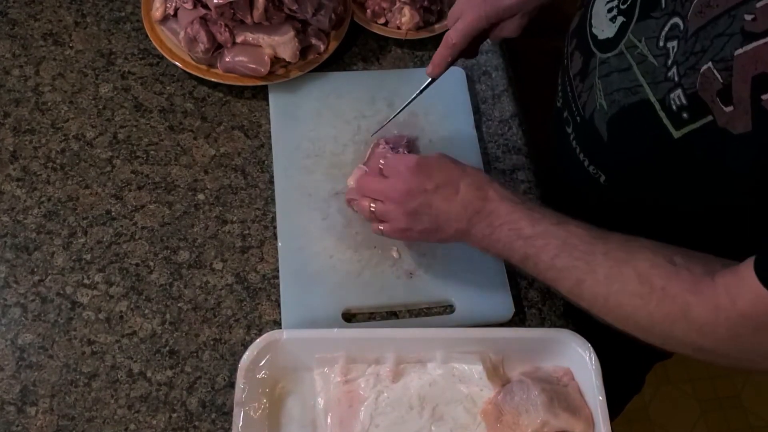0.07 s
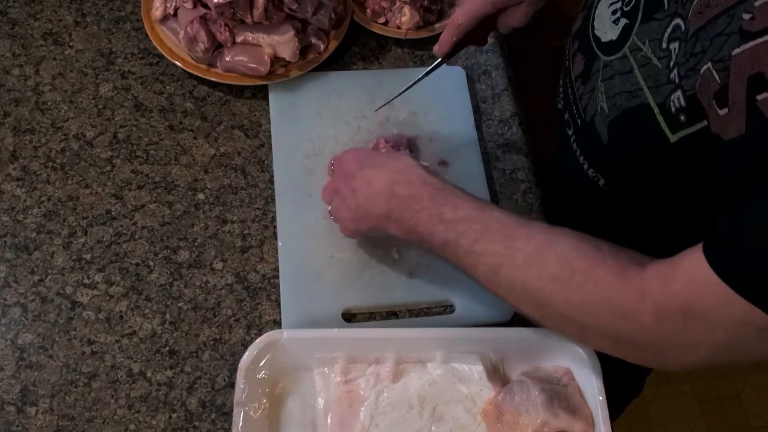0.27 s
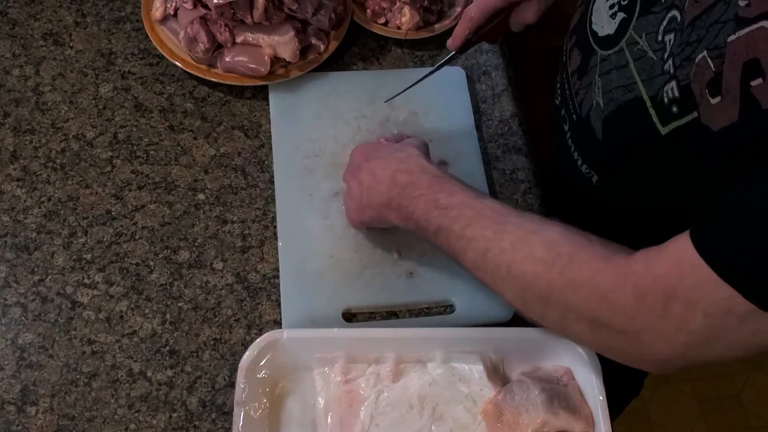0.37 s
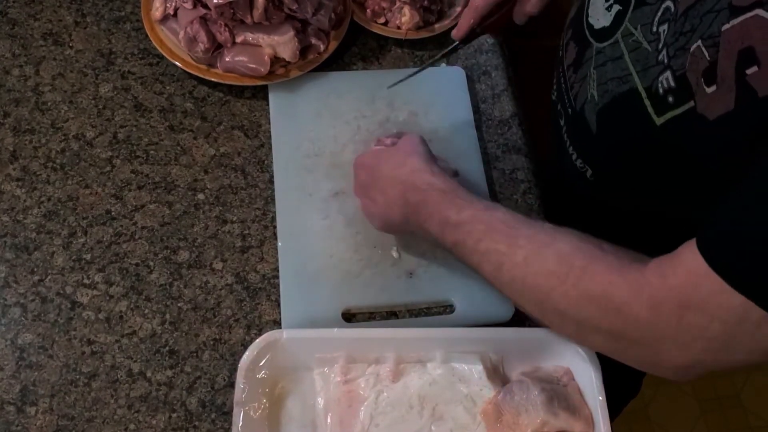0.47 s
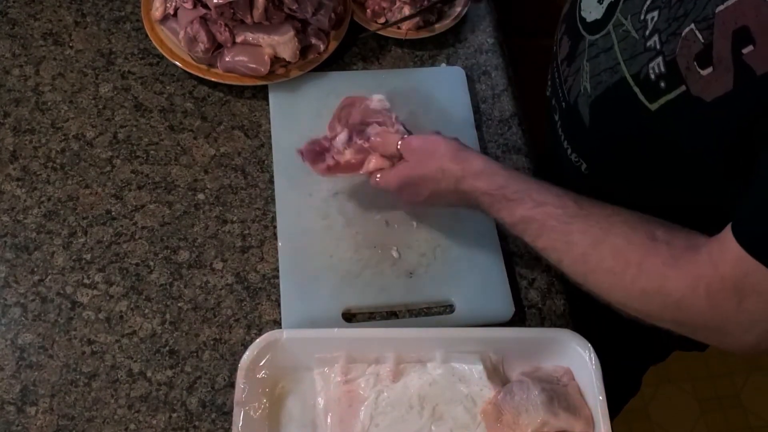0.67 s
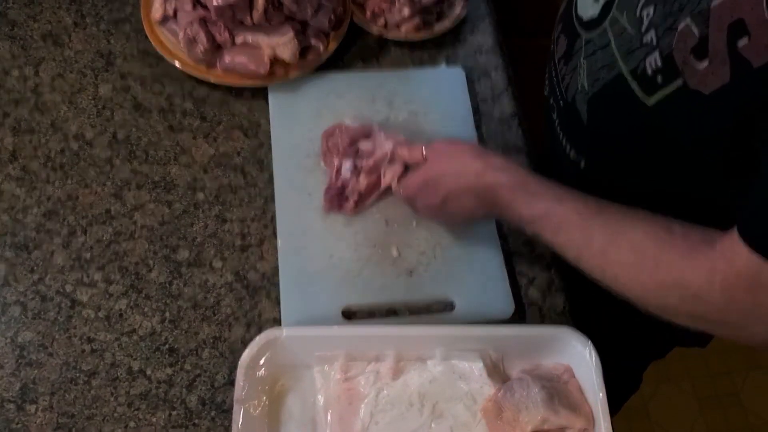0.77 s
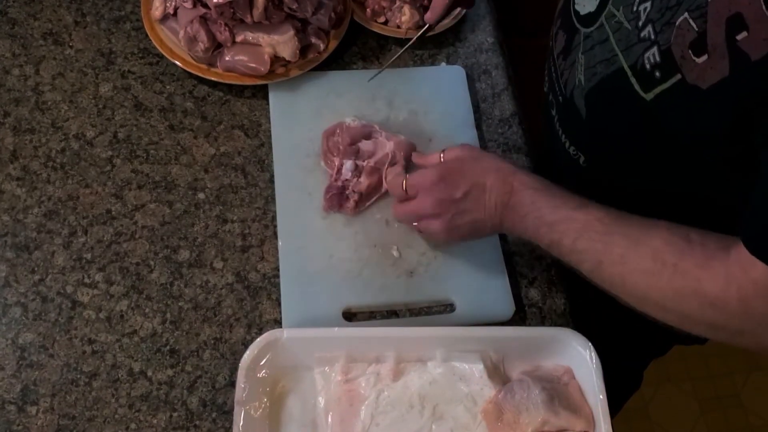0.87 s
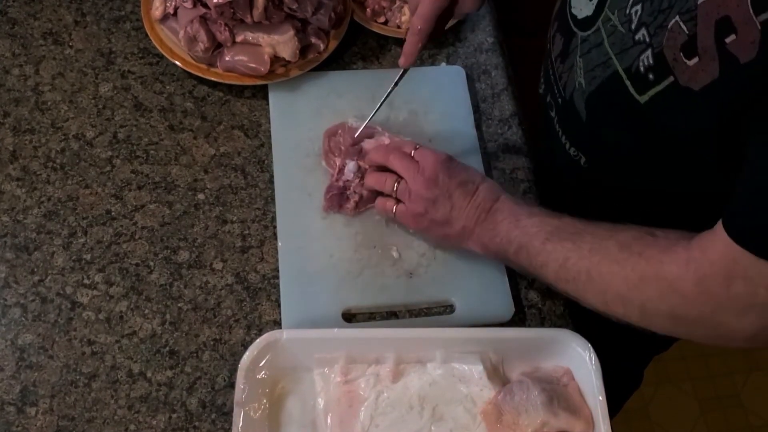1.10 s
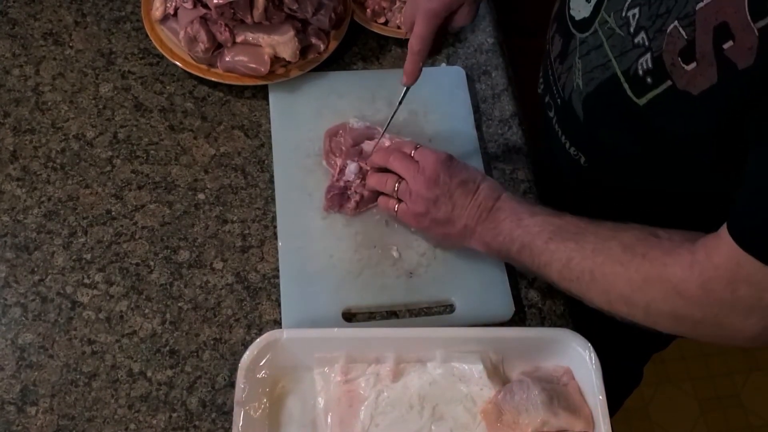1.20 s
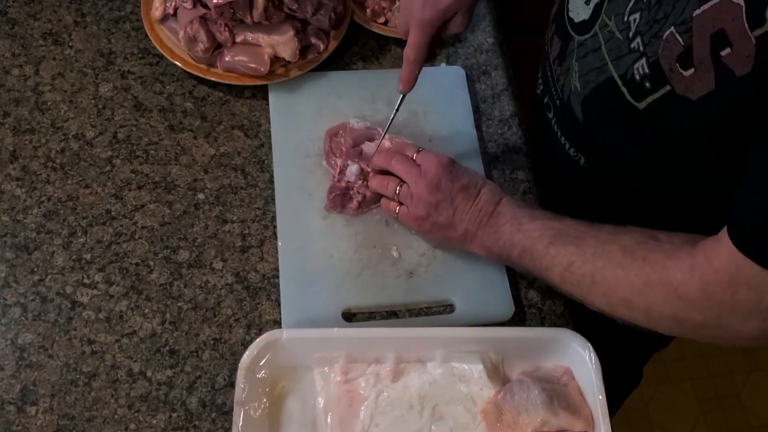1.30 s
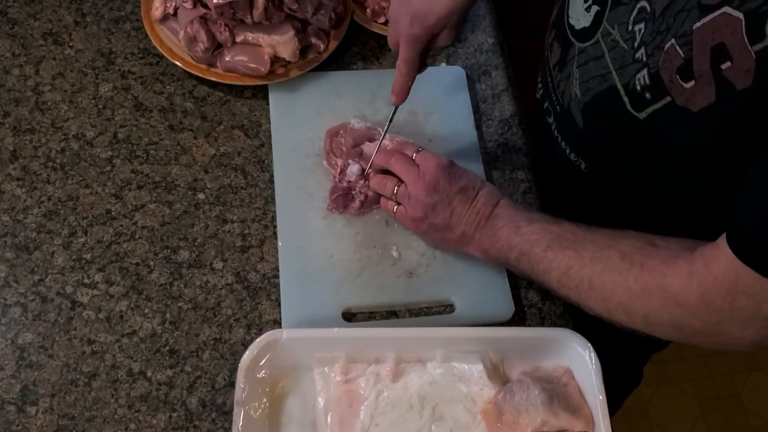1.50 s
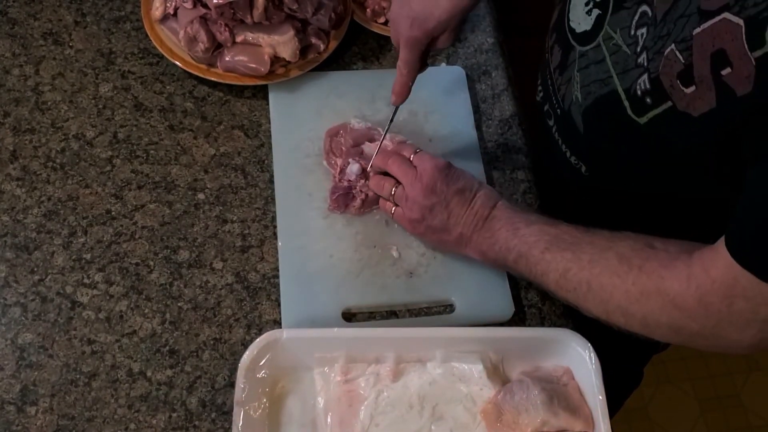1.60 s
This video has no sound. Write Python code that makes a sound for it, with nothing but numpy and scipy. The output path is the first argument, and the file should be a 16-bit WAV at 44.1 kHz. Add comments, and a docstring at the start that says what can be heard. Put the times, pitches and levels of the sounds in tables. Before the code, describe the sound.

A knife knocks on a plastic cutting board: first a heavy, dull double thump, then wet meat squelching and crackling, then one sharp clack and faint presses, close microphone in a small kitchen with low rumble.

```python
"""Trimming meat in a small kitchen

One microphone hears meat worked on a plastic cutting board on a stone counter, over a low room rumble.
A heavy, dull blow shakes the board: soft pushes slap the meat and ring the board's damped modes.
Wet meat slides and crackles as it is turned over: random clicks and hiss follow the sliding effort.
The knife knocks sharply: short scrapes set off a snap and a clack. Soft presses and wet ticks follow."""
import sys
import numpy as np
from scipy import signal
from scipy.fft import rfft, irfft
from scipy.io import wavfile
from scipy.ndimage import uniform_filter1d

SR = 44100
rng = np.random.default_rng(int(sys.argv[2]) if len(sys.argv) > 2 else 0)


def file_out(sig):
    """Save sig as 16-bit WAV at sys.argv[1]."""
    # one column per channel
    cols = np.atleast_2d(sig).T
    # limit, then scale
    lim = np.clip(cols, -1, 1)
    pcm = np.round(lim * 32767).astype(np.int16)
    wavfile.write(sys.argv[1], SR, pcm)


N = 72765


def undb(db):
    """Decibels to amplitude gain."""
    return 10 ** (np.asarray(db) / 20)


def unit(x):
    """Scale to unit energy."""
    return x / np.sqrt(np.sum(x ** 2))


def clock():
    """Time of every sample in seconds."""
    return np.arange(N) / SR


def t60_fade(t60_s):
    """Exponential decay that falls 60 dB in t60_s."""
    return np.exp(-np.log(1000) * clock() / t60_s)


def level_curve(points):
    """Gain over time, drawn straight in dB between (time [s], level [dB]) points."""
    times_s, levels_db = np.array(points).T
    return undb(np.interp(clock(), times_s, levels_db))


def through(x, response):
    """Pass a sound through an impulse response."""
    return signal.fftconvolve(x, response)[:N]


def place(x, start_s):
    """Delay a sound to its start time and pad it to the full length."""
    silence = np.zeros(max(int(start_s * SR), 0))
    return np.concatenate([silence, x, np.zeros(N)])[:N]


def colour(points):
    """Minimum-phase unit-energy response with the given (frequency [Hz], level [dB]) spectrum."""
    hz, db = np.array(points).T
    size = 8192
    bins_hz = np.fft.rfftfreq(size, 1 / SR)
    log_gain = np.log(undb(np.interp(np.log(bins_hz + 1), np.log(hz), db)))
    # folding the cepstrum onto positive times makes the response causal
    cepstrum = irfft(log_gain)
    cepstrum[1:size // 2] *= 2
    cepstrum[size // 2 + 1:] = 0
    return unit(irfft(np.exp(rfft(cepstrum))))


def noise(points):
    """Steady noise of the given colour, rms about 1."""
    return through(rng.standard_normal(N), colour(points))


def even(x, width_hz):
    """Level out the broad colour of a noisy response, keeping the first half of its time."""
    spectrum = rfft(x)
    width_bins = max(int(width_hz * N / SR), 1)
    power = uniform_filter1d(np.abs(spectrum) ** 2, width_bins)
    flat = irfft(spectrum / np.sqrt(np.abs(power) + 1e-12), N)
    return unit(flat * (np.arange(N) < N // 2))


def burst(fade_s):
    """Colourless unit-energy noise that dies away; fade_s is the time constant of its first fade."""
    fade = np.exp(-clock() / fade_s)
    x = rng.standard_normal(N) * fade
    # levelling the colour smears the noise in time, so each pass fades it a little more first
    for _ in range(3):
        x = even(x * np.sqrt(np.sqrt(fade)), 1 / (10 * fade_s))
    return x


# low rumble of the room, columns (frequency [Hz], level [dB])
RUMBLE_SPECTRUM = [(22, -5), (45, 15), (70, -0.5), (130, -5), (320, -12), (480, -13), (800, -15.5),
                   (1100, -25), (2200, -29.5), (3200, -42.5), (3950, -30.5), (5500, -46), (8000, -40),
                   (15500, -54.5)]
RUMBLE_DB = -59.5


def room_rumble():
    """Steady background noise of the room, strongest in the bass."""
    return undb(RUMBLE_DB) * noise(RUMBLE_SPECTRUM)


# colour of the kitchen's reflections, columns (frequency [Hz], level [dB])
ROOM_SPECTRUM = [(30, -13), (100, -4.5), (300, -2), (650, 3), (1000, -5), (1700, 2), (2800, -9),
                 (4500, -1.5), (6500, -0.5), (10000, -3.5), (16000, -1.5)]
ROOM_T60_S, ROOM_TREBLE_T60_S, ROOM_HOLD_S, ROOM_GAP_S = 0.3, 0.15, 0.049, 0.004
EARLY_DB, EARLY_T60_S = 9.5, 0.041


def kitchen_response():
    """Quick reflections off the counter, then a dense tail that holds briefly and dies sooner in the treble."""
    t = clock()
    low = signal.butter(2, 5000, "low", fs=SR, output="sos")
    high = signal.butter(2, 5000, "high", fs=SR, output="sos")
    bass = signal.sosfilt(low, rng.standard_normal(N))
    treble = signal.sosfilt(high, rng.standard_normal(N))
    # the age grows slowly at first, which holds the tail up
    age = np.log(1000) * (np.hypot(t, ROOM_HOLD_S) - ROOM_HOLD_S)
    tail = bass * np.exp(-age / ROOM_T60_S) + treble * np.exp(-age / ROOM_TREBLE_T60_S)
    early = undb(EARLY_DB) * rng.standard_normal(N) * t60_fade(EARLY_T60_S)
    level = even(tail + early, 40)
    return place(unit(through(level, colour(ROOM_SPECTRUM))), ROOM_GAP_S)


def kitchen(x):
    """What the kitchen returns of a sound, through freshly drawn reflections."""
    return through(x, kitchen_response())


# colour of the drag, columns (frequency [Hz], level [dB])
RUB_SPECTRUM = [(30, -0.5), (65, 11), (130, 0.5), (300, -3), (900, -9), (1600, -10.5), (4000, -14),
                (6000, -44.5), (16000, -40)]
# hand and meat dragging on the board, columns (time [s], level [dB])
RUB_LEVEL = [(0.131, -88), (0.381, -55), (0.452, -55.5), (0.57, -61.5), (0.76, -62), (0.95, -68.5),
             (1.65, -82)]


def rubbing():
    """Low rustle of hand and meat dragged over the board: coloured noise that follows the drag."""
    return noise(RUB_SPECTRUM) * level_curve(RUB_LEVEL)


# the blade slicing through the meat, columns (time [s], level [dB])
SLICE_LEVEL = [(0, -74.5), (0.039, -63.5), (0.09, -68.5), (0.14, -89)]
SLICE_HZ = 816  # centre of an octave band


def slicing():
    """Soft rasp of the blade drawn through the meat: a band of noise."""
    edges_hz = [SLICE_HZ / np.sqrt(2), SLICE_HZ * np.sqrt(2)]
    band = signal.butter(2, edges_hz, "band", fs=SR, output="sos")
    rasp = signal.sosfilt(band, rng.standard_normal(N))
    return rasp / rasp.std() * level_curve(SLICE_LEVEL)


# larger wet ticks of the meat, columns (time [s], level [dB])
WET_TICKS = [(0.0396, -41.5), (0.0659, -27), (0.075, -32), (0.3738, -28), (0.4774, -41), (0.497, -28.5),
             (0.541, -40.5), (1.497, -48), (1.628, -40)]
# sliding effort of the meat, columns (time [s], level [dB] before the click and hiss gains)
SLIDE_EFFORT = [(0, -64), (0.05, -85), (0.074, -62.5), (0.13, -136), (0.22, -88), (0.298, -68.5),
                (0.357, -64), (0.378, -56), (0.41, -67.5), (0.457, -55.5), (0.517, -68), (0.542, -53.5),
                (0.575, -83), (0.69, -84), (0.75, -66.5), (0.82, -91.5), (1.032, -100), (1.131, -74.5),
                (1.19, -99.5), (1.31, -78.5), (1.39, -99), (1.456, -78.5), (1.54, -97), (1.65, -74.5)]
# colour of the wet film, columns (frequency [Hz], level [dB])
WET_SPECTRUM = [(200, -34), (2000, -13), (4000, 1), (6000, 2), (7500, -5), (9500, 1.5), (12000, -0.5),
                (14000, 5.5), (16000, 5.5)]
CLICKS_PER_S, CLICK_SPREAD_DB, CLICKS_DB, HISS_DB = 9300, 3, 2, -9.5
TICK_FADE_S, WET_ROOM_DB = 0.001, -6


def wet_meat():
    """The wet film tears in tiny clicks and hiss as the meat slides; a few larger ticks stand out."""
    clicks = (rng.random(N) < CLICKS_PER_S / SR) * rng.standard_normal(N)
    # some clicks are much stronger than most
    clicks = clicks * undb(CLICK_SPREAD_DB * np.minimum(rng.exponential(size=N), 4))
    hiss = undb(HISS_DB) * rng.standard_normal(N)
    film = undb(CLICKS_DB) * clicks / clicks.std() + hiss
    ticks = sum(place(undb(db) * burst(TICK_FADE_S), s) for s, db in WET_TICKS)
    direct = through(film * level_curve(SLIDE_EFFORT) + ticks, colour(WET_SPECTRUM))
    return direct + undb(WET_ROOM_DB) * kitchen(direct)


# modes of the board on the counter, columns (frequency [Hz], energy level [dB], t60 [s])
BOARD_MODES = [(48.05, -5.5, 0.25), (68.65, -6, .45), (123.6, -3.5, 0.26), (226.2, -8, 0.49),
               (301.3, -0.5, 0.14), (334, -8.5, 0.24), (398, -15.5, 0.16), (487, -2, 0.28), (562, -12, .12),
               (757, -3.5, 0.19), (898, -13, .15), (1044, -11, 0.33), (1393, -13, .28), (1530, -13.5, .28)]


def board_ring(blows):
    """The board's decaying modes driven by the blows, at the same energy as the blows."""
    t = clock()
    modes = 0
    for k, (hz, db, t60_s) in enumerate(BOARD_MODES):
        mode = unit(np.sin(2 * np.pi * hz * t) * t60_fade(t60_s))
        modes = modes + (-1) ** k * undb(db) * mode
    return unit(through(blows, modes)) * np.sqrt(np.sum(blows ** 2))


# knife against plastic, columns (frequency [Hz], energy level [dB], t60 [s] of the exponential part)
CLACK_MODES = [(904, -3.5, 0.0091), (1387, 0, 0.0062), (2160, -10.5, 0.0042), (2825, -0.5, 0.0047),
               (3725, -16, 0.0046), (4540, -13.5, 0.0032), (6370, -27, 0.0079), (9300, -26, 0.0098)]


def clack():
    """Heavily damped modes that swell for a moment while the edge bites into the plastic."""
    t = clock()
    modes = 0
    for k, (hz, db, t60_s) in enumerate(CLACK_MODES):
        mode = unit(t * np.sin(2 * np.pi * hz * t) * t60_fade(t60_s))
        modes = modes + (-1) ** k * undb(db) * mode
    return unit(modes)


# hard contacts of the knife,
# columns (time [s], level [dB] before ring and room, scrape low-pass [Hz], first fade constant [ms])
KNIFE_KNOCKS = [(0.2235, -20, 4100, 1.45), (0.2282, -9.5, 4750, 1.8), (0.2385, -16.5, 3800, 1.3),
                (0.26, -10, 4860, 15), (0.319, -13.5, 2300, 3.9), (0.797, -15.5, 3500, 0.65),
                (0.7997, 2.5, 16000, 0.65), (0.8033, -9, 18200, 0.37), (1.1174, -36, 4500, 0.34)]
# colour of the snap, columns (frequency [Hz], level [dB])
SNAP_SPECTRUM = [(30, 0), (120, 13), (450, 6.5), (640, 0.5), (1000, 8), (1900, -4.5), (3000, -7),
                 (5000, -17.5), (7500, -21.5), (10000, -17), (15500, -27.5)]
SNAP_DB, CLACK_DB, KNOCK_RING_DB, KNOCK_ROOM_DB = -1.5, 1.5, -9, -1.5
# level of the clack sent into the room, relative to the snap; keeps the reflections evenly coloured
CLACK_TO_ROOM_DB = -4.5


def knocks():
    """A brief hard scrape sets off a snap, a few milliseconds of clack and a little ring of the board."""
    snap = undb(SNAP_DB) * place(colour(SNAP_SPECTRUM), 0)
    plastic = undb(CLACK_DB) * clack()
    contact = snap + plastic
    force = 0
    for s, db, hz, ms in KNIFE_KNOCKS:
        dulling = signal.butter(3, hz, fs=SR, output="sos")
        scrape = signal.sosfilt(dulling, burst(ms / 1000))
        loudness = np.linalg.norm(through(scrape, contact))
        force = force + place(undb(db) * scrape / loudness, s)
    direct = through(force, contact)
    # the mix sent to the room keeps the overall energy of the contact response
    room_send = unit(snap + undb(CLACK_TO_ROOM_DB) * plastic) * np.linalg.norm(contact)
    room = kitchen(through(force, room_send))
    return direct + undb(KNOCK_RING_DB) * board_ring(direct) + undb(KNOCK_ROOM_DB) * room


def push(contact_s):
    """Force pulse of unit area, peaking near half the contact time: the longer, the duller."""
    u = (clock() + 1 / SR) / (contact_s / 2)
    force = u * np.exp(-u)
    return force / force.sum()


# dull blows and presses on the board,
# columns (time [s], level [dB] before ring and room, contact time [ms])
BOARD_BLOWS = [(0.2247, -5.5, 0.75), (0.2274, 6, 0.59), (0.2317, 4.5, 2.4), (0.2517, -4, 0.31),
               (0.278, -4.5, 2.2), (0.313, -10.5, 0.36), (0.438, -24, 4.8), (0.7763, -19, 0.41),
               (0.7813, -6, 1.65), (0.81, 2.5, 24), (1.087, -19, 6.1), (1.123, -17, 6.8),
               (1.419, -26.5, 8.6)]
# colour of the blows, columns (frequency [Hz], level [dB])
BLOW_SPECTRUM = [(25, -9.5), (60, -1), (130, 0), (300, -4), (520, -6), (900, -11), (1500, -11.5),
                 (4200, -3.5), (5700, -24), (6500, -24), (8000, -57), (16000, -48.5)]
SLAP_DB, SLAP_FADE_S, SLAP_ABOVE_HZ = 3.5, 0.011, 150
THUD_RING_DB, THUD_ROOM_DB = -0.5, -3


def thuds():
    """Soft, heavy pushes move the whole board, slap the meat and ring the board's modes."""
    body = colour(BLOW_SPECTRUM)
    no_bass = signal.butter(2, SLAP_ABOVE_HZ, "high", fs=SR, output="sos")
    direct = 0
    for s, db, ms in BOARD_BLOWS:
        slap = undb(SLAP_DB) * signal.sosfilt(no_bass, through(burst(SLAP_FADE_S), body))
        blow = through(push(ms / 1000), place(body, 0) + slap)
        direct = direct + place(undb(db) * unit(blow), s)
    return direct + undb(THUD_RING_DB) * board_ring(direct) + undb(THUD_ROOM_DB) * kitchen(direct)


def scene():
    """All the work at the board over the steady rumble of the room, in one channel."""
    background = room_rumble() + rubbing()
    meat = slicing() + wet_meat()
    return (background + meat + knocks() + thuds())[None]


def record(dry):
    """The microphone drops the deepest bass and cuts the top."""
    bass_cut = signal.butter(4, 34, "high", fs=SR, output="sos")
    top_cut = signal.ellip(10, 0.2, 70, 15500, fs=SR, output="sos")
    return signal.sosfilt(top_cut, signal.sosfilt(bass_cut, dry))


dry = scene()
out = record(dry)
file_out(out)
```